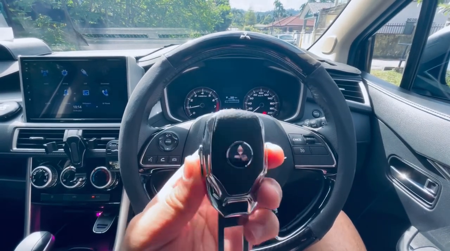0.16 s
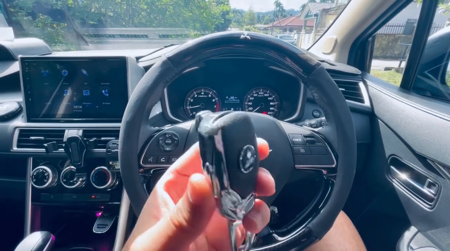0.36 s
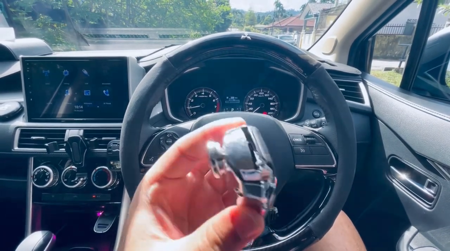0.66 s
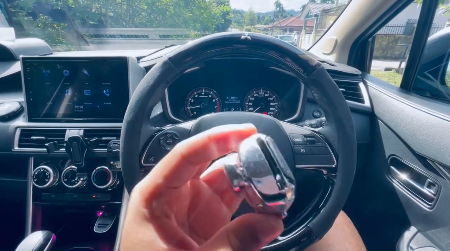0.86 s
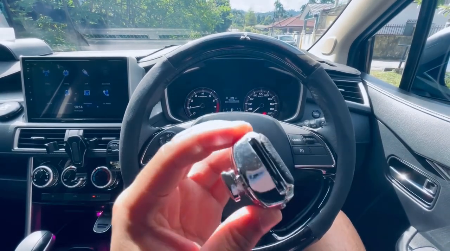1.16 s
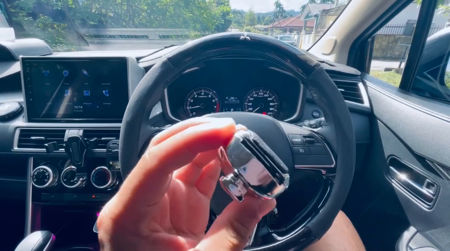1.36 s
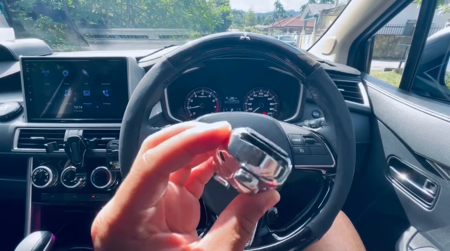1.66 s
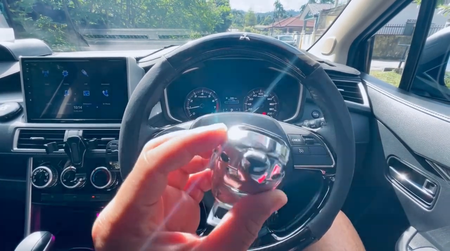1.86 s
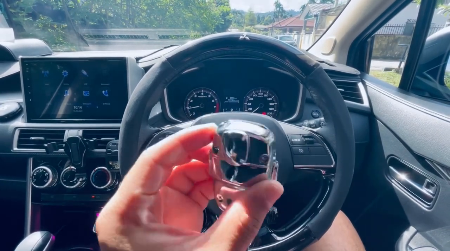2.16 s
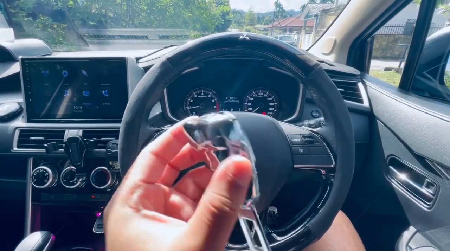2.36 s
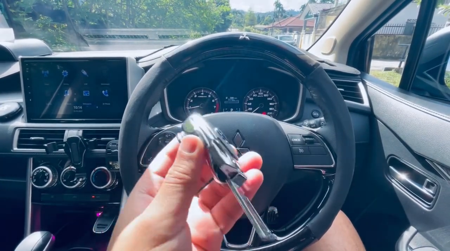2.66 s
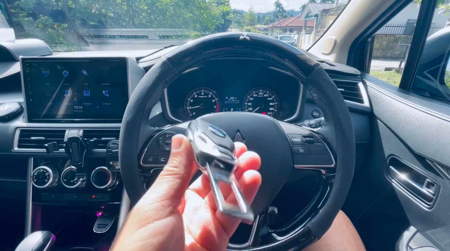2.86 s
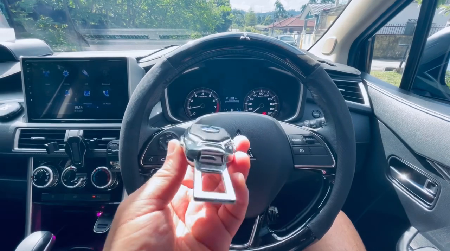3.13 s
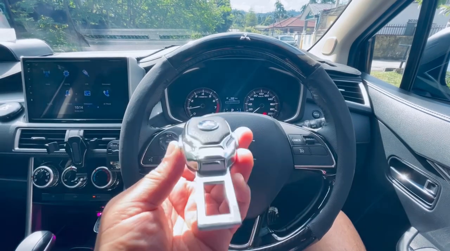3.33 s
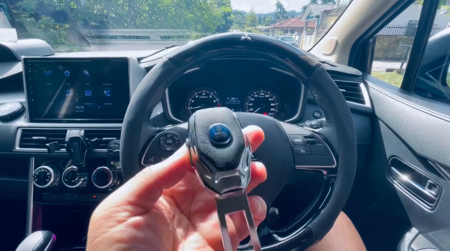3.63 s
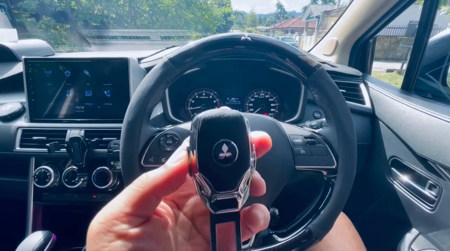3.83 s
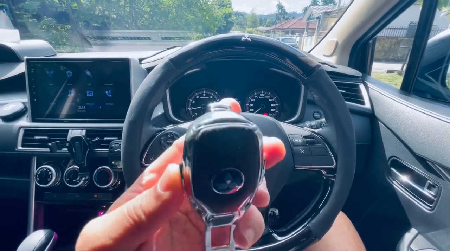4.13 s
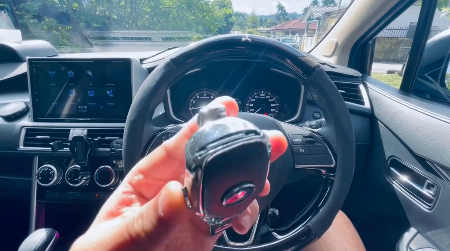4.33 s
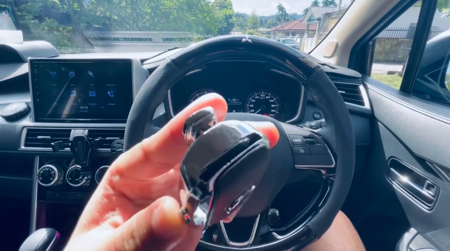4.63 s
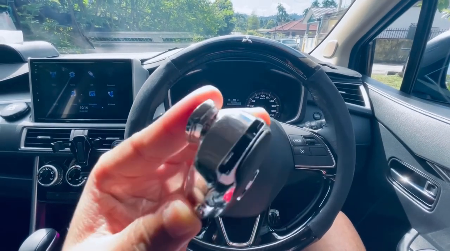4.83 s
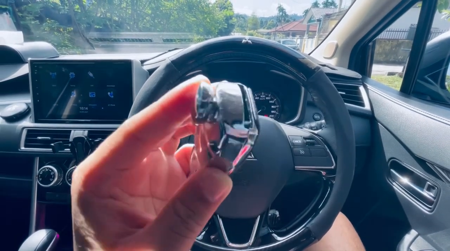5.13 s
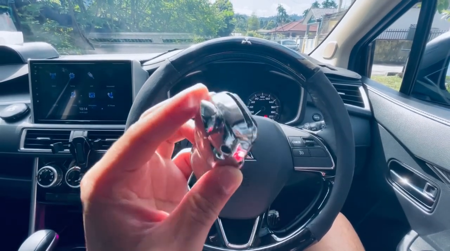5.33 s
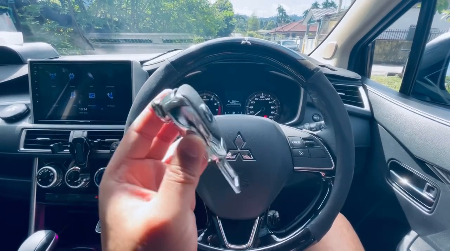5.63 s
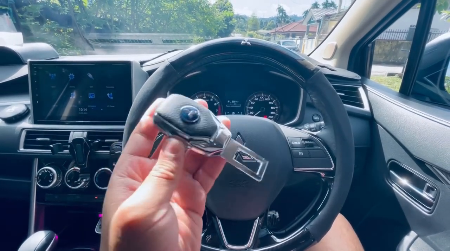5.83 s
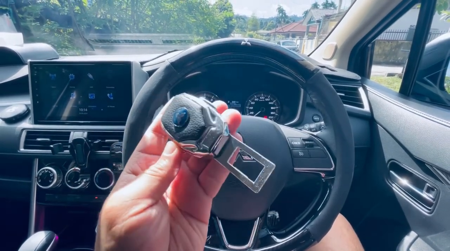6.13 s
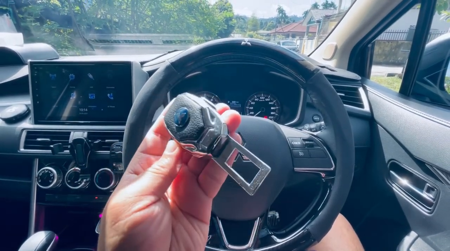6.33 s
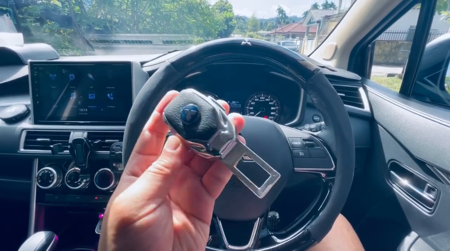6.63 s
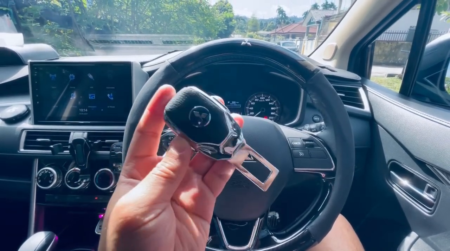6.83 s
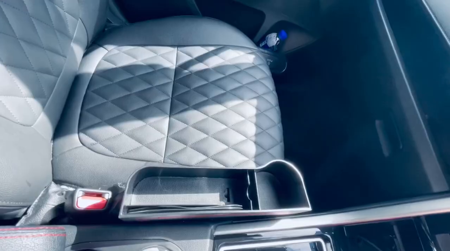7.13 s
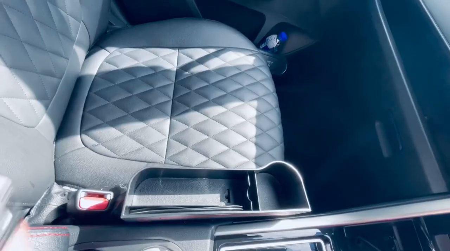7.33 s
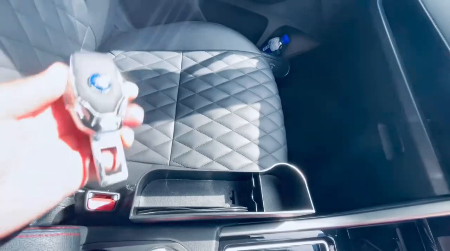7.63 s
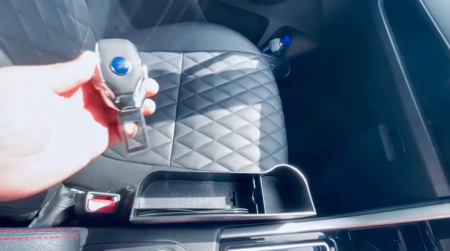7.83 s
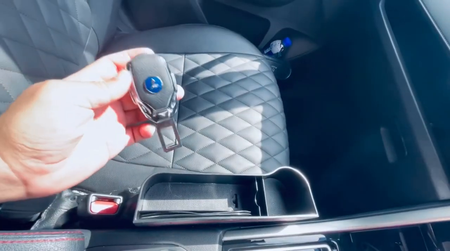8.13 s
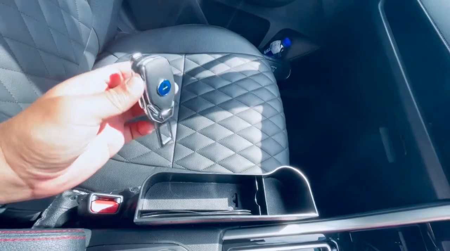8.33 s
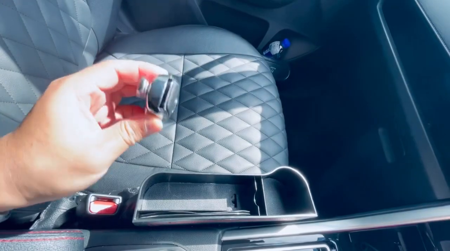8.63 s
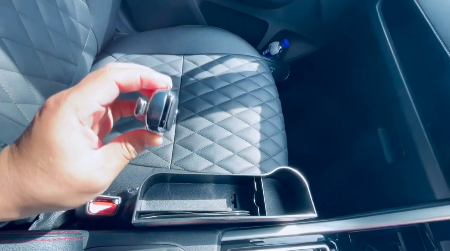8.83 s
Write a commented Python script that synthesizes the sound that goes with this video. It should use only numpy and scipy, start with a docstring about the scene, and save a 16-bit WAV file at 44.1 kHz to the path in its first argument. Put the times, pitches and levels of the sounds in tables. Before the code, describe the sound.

A parked car's cabin, heard from a close stereo microphone. Throughout, a deep idling engine hum with slow wavering, low body rumble and soft, dull vent air, with barely audible electronic whine. At about 1.1 s a dull, short low bump, as of a hand on the microphone; around 1.8 s a very faint click. Otherwise the drone runs alone until 7.04 s, when the sound cuts sharply to above the passenger seat: the background dips for an instant and returns slightly changed in tone. Immediately clothing hisses over leather and a metal edge scrapes, with a dense flurry of crisp, bright ticks and small dull knocks until about 7.4 s. Shorter rustles and clicks follow to 7.8 s, a few lighter ticks near 8.0 s, then sparse, faint metallic ticks around 8.5, 8.65 and 8.9 s. Reverberation is very short; the hum continues to the end.

```python
"""Inside a parked car, engine hum and vent air run throughout, as tones and shaped noise.
At first, before the steering wheel, a dull decaying bump and a small click stand out.
At 7.04 s the sound cuts to a place above the passenger seat, with a brief dip of hum and air.
There clothing hisses over leather (grainy noise), the metal edge of a seatbelt extender scrapes (short
rings), and its buckle ticks in the fingers (noise cracks and metal modes), ever more sparsely and faintly.
"""
import sys
import numpy as np
from scipy import signal
from scipy.fft import rfft, irfft
from scipy.io import wavfile

SR = 44100
rng = np.random.default_rng(int(sys.argv[2]) if len(sys.argv) > 2 else 0)


def digitize_waveform(pressure):
    """Quantize a signal to 16-bit integers and store it at the path in sys.argv[1].

    Rows of a 2-D input are taken as channels; values are limited to [-1, 1].
    """
    field = np.atleast_2d(pressure).T
    bounded = np.clip(field, -1, 1)
    quanta = np.round(bounded * 32767).astype(np.int16)
    wavfile.write(sys.argv[1], SR, quanta)


N = 396018

# Levels in the tables are nominal; offsets set in scene() are added to them.
# Engine orders. Each row: multiple of the firing rate, left and right level at the wheel in dB,
# left and right level over the seat in dB.
ENGINE_ORDERS = [(1, -49, -48.5, -57, -57), (2, -47, -44.5, -42, -41), (3, -47.5, -49, -71, -60),
                 (4, -48.5, -46, -50, -46.5), (5, -63.5, -55.5, -99, -59), (6, -66, -54.5, -62, -73),
                 (8, -79.5, -66.5, -62, -69), (9, -72.5, -73.5, -51.5, -55.5), (10, -72, -73, -55.5, -57),
                 (13, -61, -67, -69, -82), (19, -69, -68, -78, -80)]
# Fans and belt-driven parts. Each row: frequency in Hz, left and right level at the wheel in dB,
# left and right level over the seat in dB.
FAN_TONES = [(38.4, -59.5, -65, -67, -53), (65.8, -56.5, -53, -49, -53), (75.8, -54, -45.5, -67, -60),
             (97.4, -57, -56, -47.5, -51.5), (116.4, -58, -60, -56, -55), (140.7, -68, -69, -59, -53.5),
             (172.9, -51.5, -43.5, -54, -60), (186.2, -52.5, -47, -47, -52), (332, -80, -81.5, -58, -63.5),
             (350.3, -66, -64, -76, -70), (375.7, -62.5, -77, -66.5, -64.5), (394.4, -78, -78, -63, -75),
             (405.7, -76, -76, -60.5, -69), (430.3, -65, -70.5, -76, -79), (503, -80, -80, -65.5, -67.5),
             (565.6, -71, -69, -68.5, -66), (636, -84.5, -85, -70, -67)]
# Fan motor and dashboard electronics, faint whines. Columns as in FAN_TONES.
WHINE_TONES = [(1557, -83, -81.5, -96, -94), (3410, -95.5, -94, -100, -100), (3870, -91.5, -93.5, -98, -91),
               (4420, -98, -99.5, -84, -83), (6000, -102, -102, -105, -105)]
# Body rumble and vent air at each place. Each row: frequency in Hz, level in dB per Hz,
# left minus right in dB, left-right likeness (clipped to +-0.95 in use).
WHEEL_RUMBLE = [(20.2, -82.5, 4.5, 0.29), (29.8, -71.5, 3, 1), (42.7, -62, 8, 0.2), (59, -59.5, 4, 1),
                (80, -58.5, 0, 0.88), (108, -58, 0, 0.92), (131, -66.5, 1.5, 0.54), (172, -63.5, 0.5, 0.82),
                (204, -69, -1.5, 0.58), (252, -78.5, -4.5, -0.19), (312, -76.5, -2.5, -0.21),
                (365, -74, 4.5, 0.39), (551, -78, 4, 0.33), (688, -83.5, 0.5, -0.48)]
WHEEL_AIR = [(737, -82, 2, -0.33), (856, -81.5, 6, -0.25), (1080, -86.5, 3.5, -0.17), (1375, -86, 2, 0.35),
             (1516, -91, -2.5, -0.65), (1710, -98, 0, -0.17), (1900, -94.5, 0, -0.00027),
             (2540, -99.7, -0.5, 0.62), (2780, -107.4, 0, 0.11), (3860, -109.0, -1.5, -0.14),
             (4700, -117.5, 0.5, -0.088), (5950, -119.5, 3, -0.04), (8750, -124.9, -1, 0.093),
             (13200, -127.5, -1.3, 0.8)]
SEAT_RUMBLE = [(20, -75, 3, 0.75), (30, -76, -2, 0.93), (42, -68, -12, 0.97), (59, -60, -1.3, 1),
               (83, -57, -0.5, 0.98), (95, -58.5, -5, 0.99), (136, -65, 5.5, 0.93), (187, -65, -4, 0.88),
               (216, -72.5, 18, 0.83), (243, -70.5, -5.5, 0.89), (314, -71, -2, -0.2),
               (408, -78.5, 7.5, -0.36), (530, -80, -6.5, 0.11), (700, -80.5, 11, -0.44)]
SEAT_AIR = [(674, -83, -5.5, -1.16), (882, -79, 0.5, 0.43), (1104, -88.5, 0, -0.083),
            (1245, -81, -1.5, -0.047), (1490, -91, 3, -0.23), (1950, -94, -1, -0.25),
            (2700, -103.4, -0.5, -0.03), (3480, -105.9, -2, -0.23), (4170, -107.0, 0, 0.18),
            (5200, -113.5, 3, -0.19), (7000, -117.8, 2, 0.13), (9000, -116.7, -7, -0.68),
            (11500, -118.3, -0.9, 0.96), (13200, -120.8, -0.3, 0.4)]
# Narrow humps in the background noise. Each row: frequency in Hz, width in Hz, lift of the noise in dB.
WHEEL_HUMPS = [(1590, 45, 1), (3830, 77, 4), (4400, 35, 1), (5900, 250, 1.5)]
SEAT_HUMPS = [(500, 41, 3.5), (1320, 90, 2.8), (4400, 98, 3.1)]
# Dull bumps of the hand on the microphone's case and the buckle's housing.
# Each row: start in seconds, peak before the band-pass in dB, frequency in Hz, t60 in seconds.
HAND_BUMPS = [(1.073, -20.5, 189, 0.043), (7.081, -35, 298, 0.033), (7.2515, -40, 620, 0.015),
              (7.34, -32, 690, 0.009), (7.51, -33, 286, .05), (7.546, -35, 286, 0.041),
              (7.6468, -41.5, 890, 0.02)]
# Where the buckle is held. Each row: time in seconds, lead of the left side in ms, left minus right in dB.
HAND_PLACES = [(0, 0.049, -1), (7.0, 0.39, -1.5), (7.8, .41, -0.5), (8.049, 0.25, -0.5), (8.498, -0.15, 2),
               (8.65, -0.21, -2), (8.9, 0.35, -2)]
# Strokes of clothing over the seat. Each row: start in seconds, swell in seconds, length in seconds,
# hiss level in dB, scrape level in dB.
CLOTH_STROKES = [(7.035, 0.048, 0.45, -49, -49), (7.097, 0.021, 0.24, -47.5, -49),
                 (7.343, 0.018, 0.055, -56.5, -71), (7.503, .024, 0.029, -60, -72),
                 (7.616, 0.023, 0.036, -57.5, -52), (7.703, .02, 0.075, -62.5, -60),
                 (8.012, .012, .018, -68, -67)]
# Colour of the sliding. Each row: frequency in Hz, relative level in dB per Hz.
SLIDE_SPECTRUM = [(300, 2), (650, 3), (1300, 0.5), (1800, -2), (2300, -2), (3100, 3), (3800, 0), (5100, -1),
                  (6050, -3.5), (6900, -0.5), (8100, 0.5), (9500, -4), (11500, -8), (13200, -11),
                  (16000, -18)]
# Ring of the buckle. Each row: frequency in Hz, relative level in dB, t60 in seconds.
BUCKLE_MODES = [(2900, 1, 0.026), (3220, 2.5, 0.018), (4390, -2, 0.034), (4820, 2, 0.016), (5550, 0, 0.017),
                (6650, -2, 0.012), (7750, 3, 0.013), (9150, -9, 0.018), (9700, -21, .025),
                (10160, -27, .02), (12300, -21, .015)]
# Distinct contacts of buckle and fingers. Each row: start in seconds, level over the first 5 ms in dB,
# brightest frequency in Hz, broad splash against that pitch in dB, time constant of the crack in ms.
CONTACTS = [(1.7693, -71, 6300, -10, 3), (1.7991, -61, 6400, -3, 1.2), (1.8018, -61, 11000, 2, 5),
            (7.0657, -48, 2800, -10, 1.5), (7.0925, -48.5, 3800, -9, 1), (7.1078, -45, 4600, -4, 1),
            (7.1172, -41, 7000, 0, 2), (7.1226, -40, 3500, -6, 1.5), (7.1318, -42, 8100, 1, 1.5),
            (7.1435, -42, 5000, -4, 1.5), (7.2207, -44.5, 4400, -8, 0.8), (7.2305, -46.5, 3200, -6, 0.7),
            (7.2515, -38, 3050, -3, 0.6), (7.2886, -43.5, 4500, -8, 0.5), (7.3135, -49, 5200, -5, 0.7),
            (7.3286, -49, 2900, -4, 1), (7.3394, -42.5, 2900, -2, 1), (7.343, -45, 2400, -1, 1.5),
            (7.3543, -43.5, 3400, -14, 2), (7.3796, -50.5, 4900, -8, 1), (7.3848, -53, 4200, -6, 0.8),
            (7.3951, -52.5, 4800, -6, 0.8), (7.4061, -54, 5000, -6, 0.8), (7.434, -49.5, 3900, -20, 1.5),
            (7.4662, -56, 4300, -1, 1), (7.499, -60, 5700, -5, 1.5), (7.5165, -59, 2400, -16, 1.2),
            (7.5288, -56.5, 7300, -3, 1.2), (7.6108, -60, 4700, -6, 0.6), (7.6173, -54.5, 4900, -12, 0.7),
            (7.6318, -53, 7700, -1, 0.7), (7.647, -47, 5100, -16, 1.3), (7.6578, -53.5, 2400, -1, 0.7),
            (7.6637, -54.5, 7000, -2, 0.8), (7.7492, -55, 2400, -5, 0.6), (7.7585, -55, 7100, -5, 0.7),
            (7.7751, -44.5, 4000, -5, 0.7), (7.7876, -45, 5700, -8, 0.6), (7.8045, -56, 5400, -6, 0.7),
            (7.8586, -57, 5000, -6, 0.8), (7.8754, -58, 8200, -4, 0.8), (7.8815, -55.5, 8200, -3, 0.9),
            (7.947, -56, 4600, -15, 0.6), (8.0043, -57.5, 4700, -10, 0.7), (8.023, -52.5, 5300, -7, 0.7),
            (8.071, -58, 5400, -8, 1), (8.0798, -60, 6000, -6, 1), (8.127, -66, 4800, -8, 0.8),
            (8.139, -58.5, 6300, -9, 1.2), (8.3228, -68, 4800, -12, 0.7), (8.4913, -54.5, 5600, -3, 1),
            (8.496, -57.5, 8900, 6, 3.6), (8.613, -66, 7500, 0, 1), (8.6458, -50.5, 10400, -5, 1.3),
            (8.6466, -55, 4900, -16, 1.4), (8.6663, -58, 5550, -10, 3.5), (8.731, -67, 3600, -10, 0.8),
            (8.7658, -67.5, 9000, -2, 0.7), (8.7847, -66.5, 3900, -6, 0.8), (8.8878, -54, 4100, -14, 0.8),
            (8.9315, -58.5, 3400, -25, 1.2), (8.968, -60.5, 8500, -6, 4)]

TIME = np.arange(N) / SR
FREQS = np.maximum(np.fft.rfftfreq(N, 1 / SR), 1)
CUT_S = 7.04   # from the wheel to the seat
DIP_SHARE, DIP_S = 0.75, 0.015
FIRING_HZ = 28.28
CABIN_T60_S = 0.11
CUTOFF_HZ = 13700
RUMBLE_SWELL_DB, RUMBLE_SWELL_PER_S = 1.0, 3
AIR_FLUTTER_DB, AIR_FLUTTER_PER_S = 0.83, 6
# a stroke eases as it goes, then dies quickly
SAG_DB_PER_S, RELEASE_DB_PER_S = 53, 288
CATCHES_PER_S, CATCH_SPREAD_DB = 520, 4.4
CATCH_CYCLES = 19   # cycles per 60 dB of decay
CATCH_HZ, CATCH_WANDER_OCTAVES = 3730, 0.14
CATCH_SCATTER_OCTAVES = 0.52   # before soft limiting
TICKS_PER_S, TICK_OVER_SLIDE_DB, TICK_REST_DB, TICK_SPREAD_DB = 30, -2, -85, 5
TICK_LOW_HZ, TICK_HIGH_HZ = 4260, 8400
TICK_SPLASH_DB, TICK_DECAY_MS = -8, 2


def from_db(db):
    """Decibels to gain."""
    return 10 ** (np.asarray(db) / 20)


def rms_one(x):
    """Scale to unit power."""
    return x / np.sqrt(np.mean(x ** 2) + 1e-20)


def over_hz(rows):
    """Interpolate each column of a spectrum table on a log-frequency axis."""
    hz, *columns = np.transpose(rows)
    return [np.interp(np.log(FREQS), np.log(hz), column) for column in columns]


def smooth_noise(points_per_step, size):
    """Random curve of unit RMS, straight between random knots."""
    knots = rng.standard_normal(int(size / points_per_step) + 3)
    return rms_one(np.interp(np.arange(size) / points_per_step, np.arange(len(knots)), knots))


def drift(rate_hz):
    """Slow random curve in time, unit RMS, with two knots per cycle of the rate."""
    return smooth_noise(SR / rate_hz / 2, N)


def alike_noise(size, own_share):
    """White noise that the two sides partly share."""
    shared = rng.standard_normal(size)
    return rms_one(shared + own_share * rng.standard_normal((2, size)))


def band(x, low_hz, high_hz, order=2):
    """Causal band-pass."""
    edges_hz = [low_hz, min(high_hz, SR / 2 - 1000)]
    return signal.sosfilt(signal.butter(order, edges_hz, "band", fs=SR, output="sos"), x + 1e-18)


def ring(x, hz, t60_s):
    """Two-pole resonator: a unit click starts a decaying sine of height 1."""
    radius = from_db(-60 / (t60_s * SR))
    angle = 2 * np.pi * hz / SR
    return signal.lfilter([0, np.sin(angle)], [1, -2 * radius * np.cos(angle), radius ** 2], x + 1e-18)


def standing_waves(depth_db, spacing_hz):
    """Fine peaks and dips in dB that the small cabin puts on the middle and treble."""
    ripple = smooth_noise(spacing_hz * N / SR, len(FREQS))
    return depth_db * ripple * FREQS / np.hypot(FREQS, 500)


def cabin_noise(rumble, air, humps, rumble_db, air_db):
    """Steady noise at one place: body rumble below, vent air above, partly alike on the two sides."""
    is_rumble = FREQS < air[0][0]
    level_db, balance_db, alike = np.where(is_rumble, over_hz(rumble), over_hz(air))
    level_db = level_db + np.where(is_rumble, rumble_db, air_db)
    for hz, width_hz, lift_db in humps:
        level_db = level_db + lift_db / (1 + (2 * (FREQS - hz) / width_hz) ** 2)
    alike = np.clip(alike, -0.95, 0.95)
    mid, side = [rfft(rng.standard_normal(N)) * from_db(standing_waves(depth_db=2.0, spacing_hz=31.93))
                 for _ in range(2)]
    pair = np.sqrt(1 + alike) * mid + np.sqrt(1 - alike) * side * [[1], [-1]]
    sides_db = level_db + balance_db * np.array([[0.5], [-0.5]])
    return irfft(pair * from_db(sides_db), N) * np.sqrt(SR) / 2


def unsteady(x):
    """Rumble swells and air flutters, each register on its own; the top register stays steady."""
    out = 0
    for top_hz in (130, 600, 1500, 2700, 4500):
        low = signal.sosfiltfilt(signal.butter(2, top_hz, fs=SR, output="sos"), x)
        if top_hz < WHEEL_AIR[0][0]:
            sway_db = RUMBLE_SWELL_DB * drift(RUMBLE_SWELL_PER_S)
        else:
            sway_db = AIR_FLUTTER_DB * drift(AIR_FLUTTER_PER_S)
        out = out + low * from_db(sway_db)
        x = x - low
    return out + x


def hum(lines, unit_hz, at_seat, level_db, wander_s, flutter_db):
    """Wavering tones; the cabin's standing waves give each its own level at each place and side."""
    out = np.zeros((2, N))
    slip_s = wander_s * drift(0.501)   # shared timing wander
    for multiple, *levels_db in lines:
        gains = from_db(np.array(levels_db) + level_db)[:, None]
        phase = 2 * np.pi * (multiple * unit_hz * (TIME + slip_s) + rng.random()) + 0.25 * drift(2.5)
        tone = np.sqrt(2) * np.sin(phase) * from_db(flutter_db * drift(3))
        out += tone * (gains[:2] * (1 - at_seat) + gains[2:] * at_seat)
    return out


def bumps():
    """Dull knocks: an impulse rings one low, quickly damped resonance."""
    out = np.zeros(N)
    for start_s, peak_db, hz, t60_s in HAND_BUMPS:
        push = np.zeros(N)
        push[round(start_s * SR)] = -from_db(peak_db)
        out += band(ring(push, hz, t60_s), hz / 3.5, hz * 2)
    return out


def from_hand(x):
    """A stereo sound at the hand is shifted in time and level between the sides as the hand moves."""
    times_s, lead_ms, balance_db = np.transpose(HAND_PLACES)
    lead = np.round(np.interp(TIME, times_s, lead_ms) * SR / 1000).astype(int)
    right = x[1, np.clip(np.arange(N) - lead, 0, N - 1)]
    balance_db = np.interp(TIME, times_s, balance_db)
    return np.array([x[0], right]) * from_db(balance_db * np.array([[0.5], [-0.5]]))


def cabin(x, wet_db):
    """Glass and trim close by return a dense, short tail, different on each side."""
    t = TIME[:SR // 4]
    tail = rng.standard_normal((2, len(t))) * from_db(-60 * t / CABIN_T60_S) * (t > 0.002)
    tail = rms_one(tail) / np.sqrt(len(t))
    return x + from_db(wet_db) * signal.fftconvolve(x, tail, axes=1)[:, :N]


def drag():
    """Strength of the hiss and of the scrape: each stroke swells, sags and lets go."""
    out = np.zeros((2, N))
    for start_s, swell_s, length_s, *levels_db in CLOTH_STROKES:
        t = np.maximum(TIME - start_s, 0)
        sag_db = SAG_DB_PER_S * np.maximum(t - swell_s, 0)
        release_db = RELEASE_DB_PER_S * np.maximum(t - length_s, 0)
        swell = np.minimum(t / swell_s, 1)
        out += from_db(levels_db)[:, None] * swell * from_db(-sag_db - release_db)
    return out


def sliding(level_db, grains_per_s, spread_db, smooth_share, patchy_db):
    """Fibres catch and slip on the leather: dense uneven grains whose colour shifts as the folds move."""
    pressure = drag()[0] * from_db(level_db + 0.95 * drift(50))
    sizes = from_db(spread_db * np.minimum(rng.exponential(1, N), 4))
    grains = sizes * (rng.random(N) < grains_per_s / SR)
    # each slip is a puff of about a tenth of a millisecond
    puffs = rms_one(signal.lfilter([1], [1, -0.8], grains + 1e-18))
    slips = np.hypot(puffs, smooth_share) * alike_noise(N, own_share=0.99)
    coloured = rfft(slips) * from_db(over_hz(SLIDE_SPECTRUM)[0]) * FREQS / np.hypot(FREQS, 200)
    edges_hz = [0, 1500, 2600, 4000, 6000, 8500, 11000, SR]
    folds = 0
    for low_hz, high_hz in zip(edges_hz, edges_hz[1:]):
        register = irfft(coloured * (FREQS >= low_hz) * (FREQS < high_hz), N)
        folds = folds + register * from_db(patchy_db * drift(35))
    return pressure * rms_one(folds)


def scraping(level_db, ring_db):
    """The buckle's edge catches and slips: each catch rings briefly at a wandering pitch and stirs the metal."""
    count = 900
    gaps = rng.exponential(1, count)
    sizes = np.minimum(rng.exponential(1, count), 3)
    signs = rng.choice([-1, 1], count)
    starts = ((CUT_S + np.cumsum(gaps) / CATCHES_PER_S) * SR).astype(int)
    # soft limit on the scatter of pitch
    scatter = 0.64 * np.tanh(rng.normal(0, CATCH_SCATTER_OCTAVES, count) / 0.68)
    wander = CATCH_WANDER_OCTAVES * drift(14)
    out, t = np.zeros(N + SR), TIME[:SR // 40]
    for start, size, sign, octaves in zip(starts[starts < N], sizes, signs, scatter):
        cycles = CATCH_HZ * 2 ** (octaves + wander[start]) * t
        decay = from_db(CATCH_SPREAD_DB * size - 60 * cycles / CATCH_CYCLES)
        out[start:start + len(t)] += sign * decay * np.sin(2 * np.pi * cycles)
    metal = sum(from_db(db) * ring(out, hz, t60_s) for hz, db, t60_s in BUCKLE_MODES)
    out = (rms_one(out) + from_db(ring_db) * rms_one(metal))[:N]
    return from_db(level_db) * drag()[1] * out / np.std(out[starts[0]:starts[-1]])


def light_ticks():
    """Chance contacts of the loosely held buckle, harder under drag, as rows like CONTACTS."""
    chance = rng.random((200, 3))
    times_s = CUT_S + np.cumsum(0.5 + chance[:, 0]) / TICKS_PER_S
    slide = np.interp(times_s, TIME, drag()[0]) * from_db(TICK_OVER_SLIDE_DB)
    strength = np.hypot(slide, from_db(TICK_REST_DB))
    levels_db = 20 * np.log10(strength) + TICK_SPREAD_DB * (2 * chance[:, 1] - 1)
    pitches_hz = TICK_LOW_HZ * (TICK_HIGH_HZ / TICK_LOW_HZ) ** chance[:, 2]
    return [(start_s, db, hz, TICK_SPLASH_DB, TICK_DECAY_MS)
            for start_s, db, hz in zip(times_s, levels_db, pitches_hz) if start_s < TIME[-1]]


def buckle(level_db, snap, ring_db, knock_db):
    """Each contact, a snap and a pitched crack, knocks the case and rings the hand-damped metal."""
    out, t = np.zeros((2, N + SR)), TIME[:SR // 12]
    for start_s, db, hz, splash_db, decay_ms in list(CONTACTS) + light_ticks():
        crack = alike_noise(len(t), own_share=0.75) * np.exp(-1000 * t / decay_ms)
        crack[:, 0] += snap
        pitched = band(crack, hz / 1.16, hz * 1.16, order=1)
        click = pitched + from_db(splash_db) * band(crack, 2500, 12800)
        strengths = rng.normal(1, 0.97, len(BUCKLE_MODES))
        metal = sum(strength * from_db(mode_db) * ring(click, mode_hz, t60_s)
                    for strength, (mode_hz, mode_db, t60_s) in zip(strengths, BUCKLE_MODES))
        click = click + from_db(ring_db) * metal + from_db(knock_db) * band(crack, 550, 4300)
        # level is set over the first 5 ms
        click = click * from_db(db + level_db) / np.sqrt(np.mean(click[:, :SR // 200] ** 2))
        start = round(start_s * SR)
        out[:, start:start + len(t)] += click
    return out[:, :N]


def scene():
    """Hum and air at the two places, with the handling on top."""
    at_seat = np.clip((TIME - CUT_S) * 400, 0, 1)   # 2.5 ms crossfade
    wheel = cabin_noise(WHEEL_RUMBLE, WHEEL_AIR, WHEEL_HUMPS, rumble_db=-0.34, air_db=-1.14)
    seat = cabin_noise(SEAT_RUMBLE, SEAT_AIR, SEAT_HUMPS, rumble_db=-1.0, air_db=-1.43)
    rumble_and_air = unsteady(wheel * (1 - at_seat) + seat * at_seat)
    engine = hum(ENGINE_ORDERS, FIRING_HZ, at_seat, level_db=-1.6, wander_s=0.00053, flutter_db=2.5)
    fans = hum(FAN_TONES, 1, at_seat, level_db=-0.5, wander_s=0.0004, flutter_db=1.5)
    whines = hum(WHINE_TONES, 1, at_seat, level_db=-1.5, wander_s=0.0004, flutter_db=3.5)
    cloth = sliding(level_db=-0.4, grains_per_s=1500, spread_db=3.0, smooth_share=0.33, patchy_db=2.0)
    scrape = scraping(level_db=-4.0, ring_db=-10)
    clicks = buckle(level_db=-0.65, snap=3.3, ring_db=-40, knock_db=-14)
    handling = cabin(from_hand(cloth + scrape), wet_db=-2.5) + cabin(from_hand(clicks), wet_db=-3.0)
    # hum and air dip briefly just after the cut
    dip = 1 - DIP_SHARE * at_seat * np.exp(-(np.maximum(TIME - CUT_S, 0) / DIP_S) ** 2)
    return dip * (rumble_and_air + engine + fans + whines) + handling + bumps()


def record(dry):
    """Cut the deepest bass and the top."""
    no_deep_bass = signal.sosfilt(signal.butter(2, 14, "high", fs=SR, output="sos"), dry)
    return signal.sosfilt(signal.ellip(8, 0.2, 70, CUTOFF_HZ, fs=SR, output="sos"), no_deep_bass)


dry = scene()
out = record(dry)
digitize_waveform(out)
```